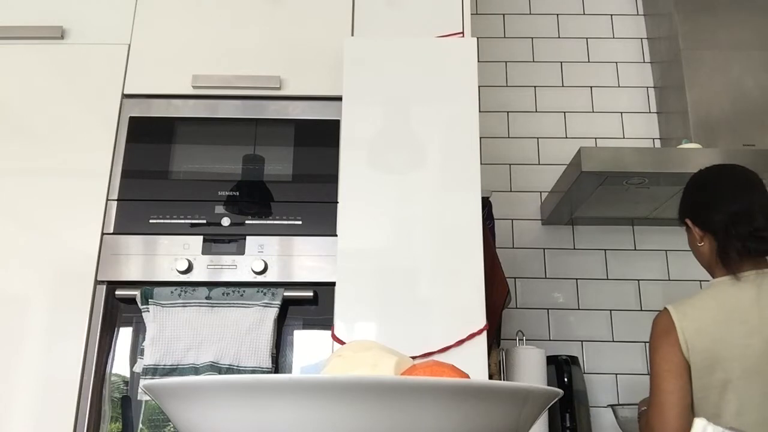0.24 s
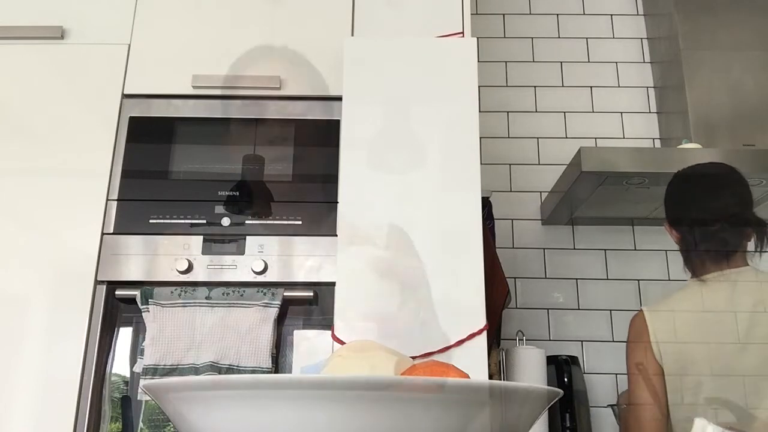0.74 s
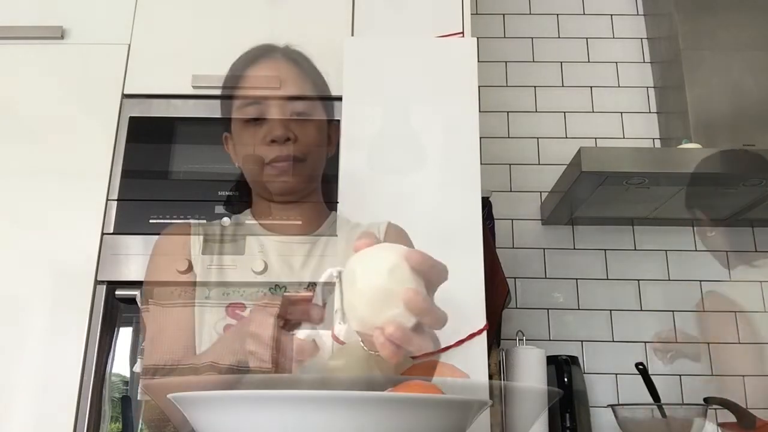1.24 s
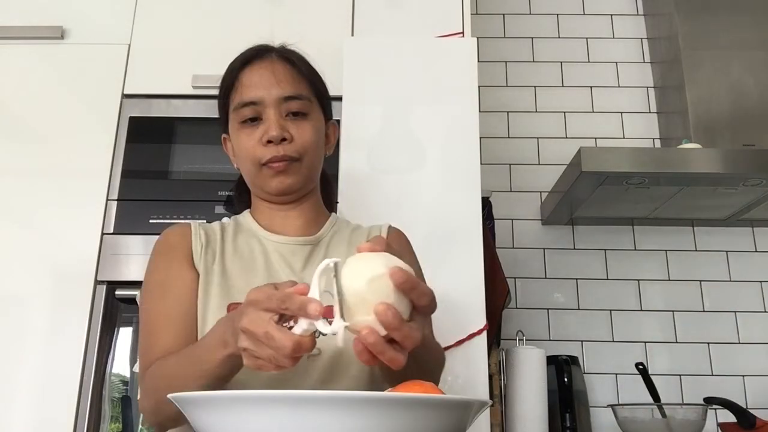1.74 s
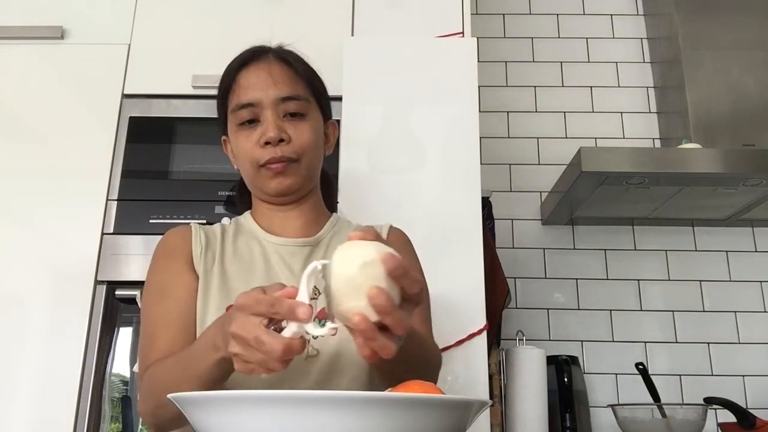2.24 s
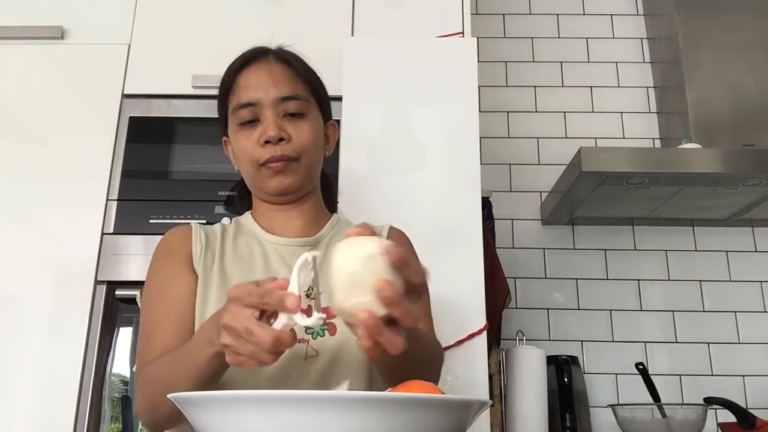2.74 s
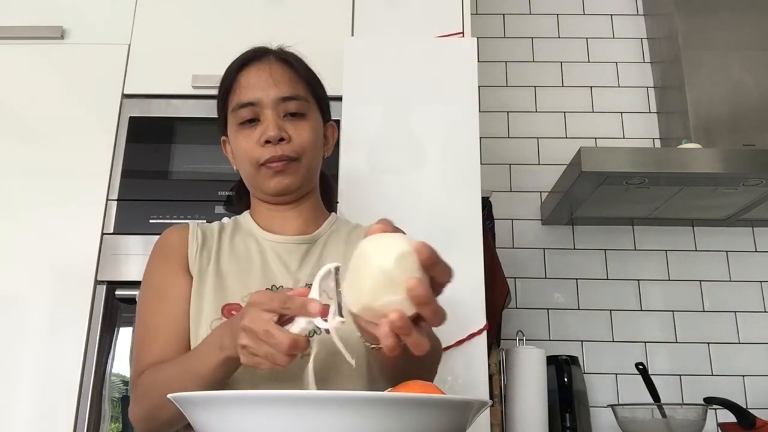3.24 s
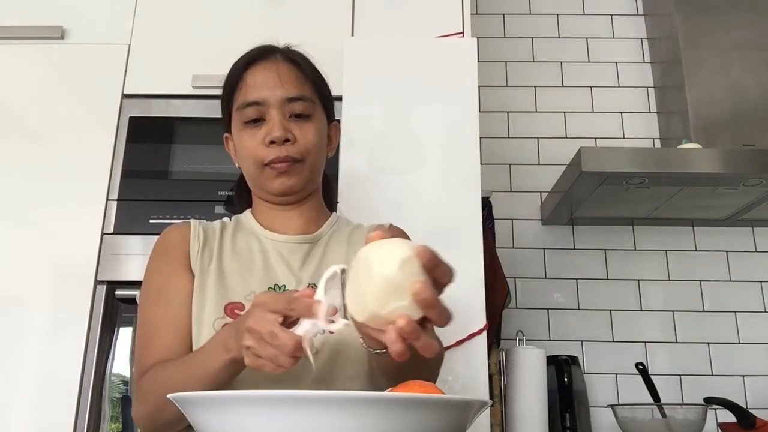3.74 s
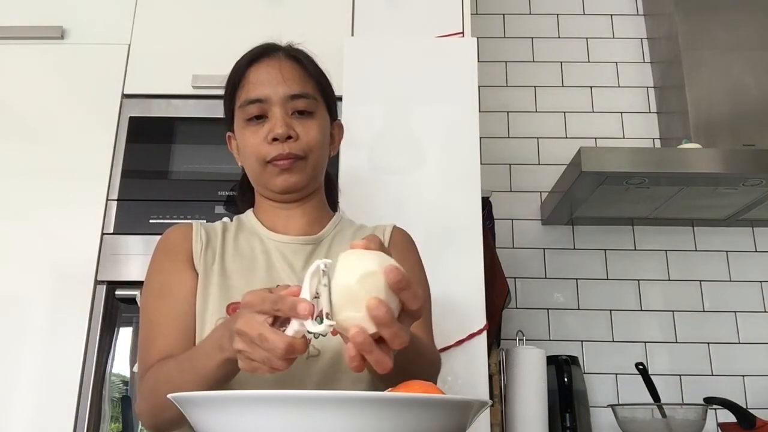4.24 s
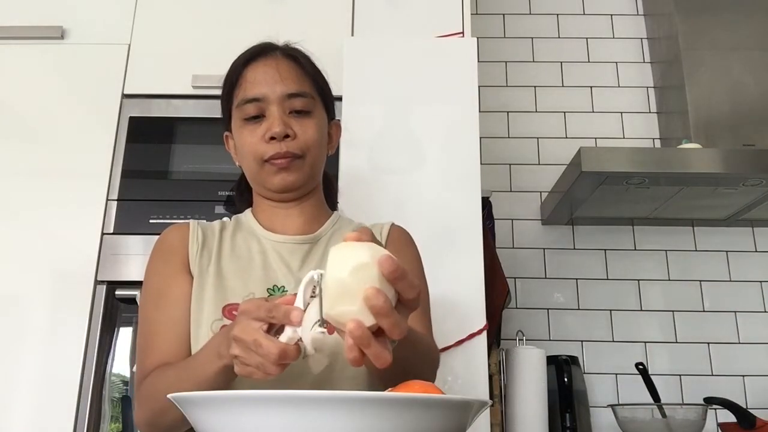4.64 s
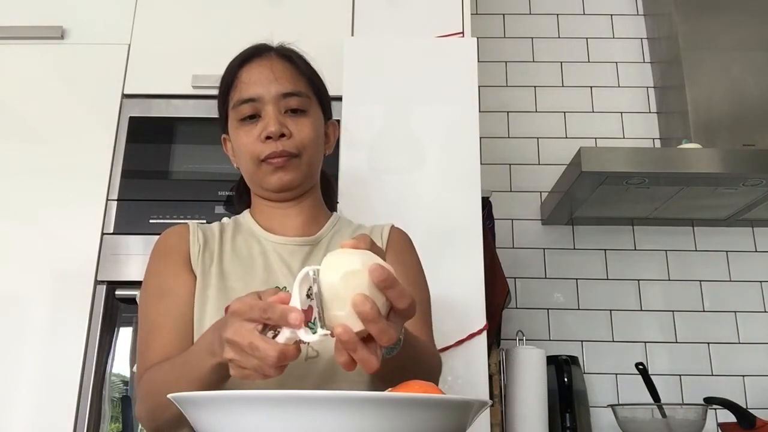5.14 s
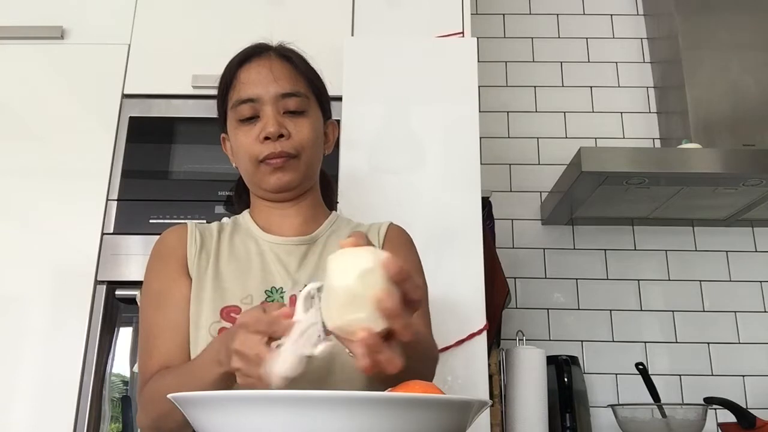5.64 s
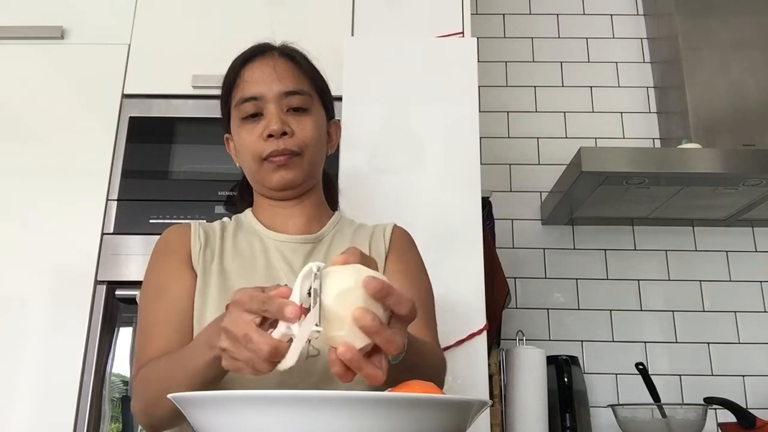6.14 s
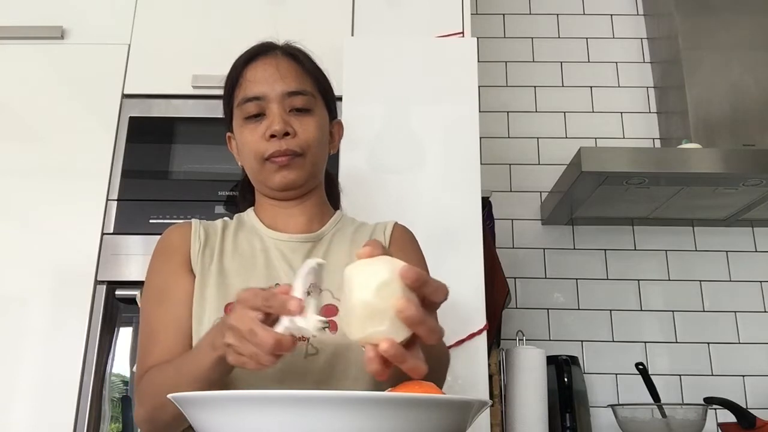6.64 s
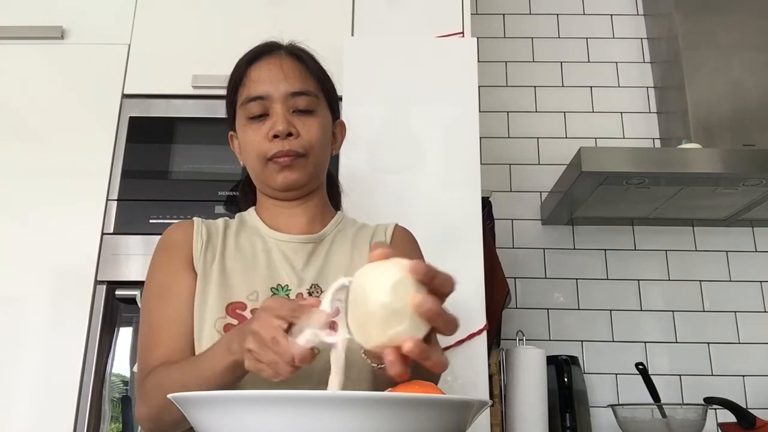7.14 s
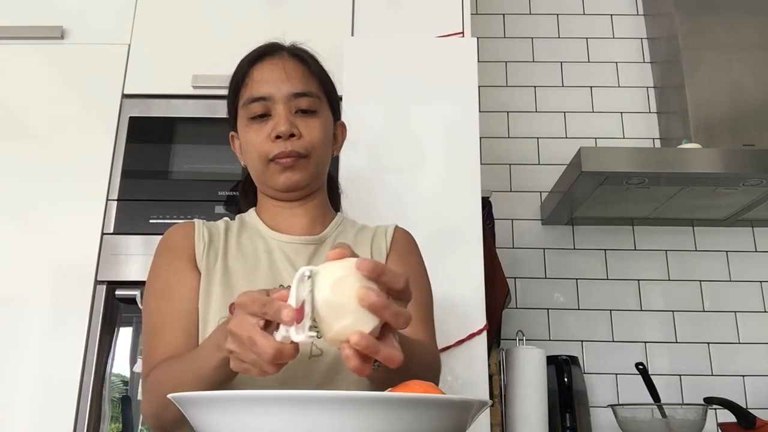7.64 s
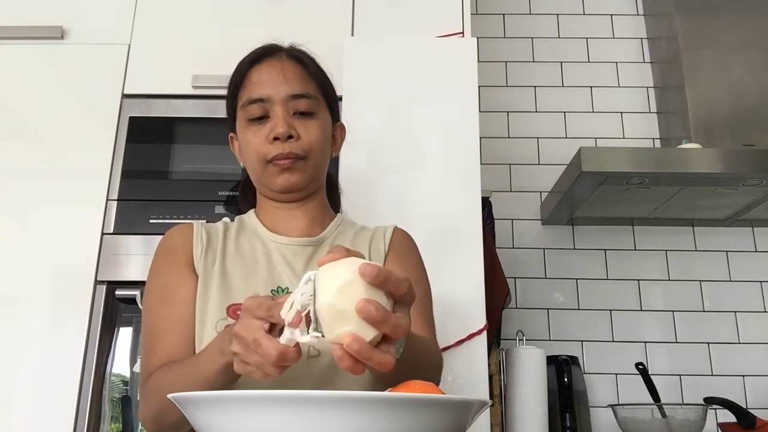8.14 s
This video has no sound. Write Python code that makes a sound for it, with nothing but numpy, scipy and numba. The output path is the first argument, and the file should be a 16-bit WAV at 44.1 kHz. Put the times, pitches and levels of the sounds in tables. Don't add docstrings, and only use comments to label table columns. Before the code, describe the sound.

Far-off cookware clanks twice, then close, crisp peeler strokes click and hiss unevenly through a firm wet vegetable over a low appliance hum.

```python
import sys
import numpy as np
from scipy import signal
from scipy.fft import rfft, irfft, next_fast_len
from scipy.io import wavfile
from numba import njit

SR = 44100
rng = np.random.default_rng(int(sys.argv[2]) if len(sys.argv) > 2 else 0)


def invert_db(x):
    u = np.asarray(x, float) / 20
    return 10 ** u


def wav_record(signal):
    frames = np.transpose(np.atleast_2d(signal))
    bounded = np.clip(frames, -1, 1)
    quanta = np.round(bounded * 32767).astype(np.int16)
    wavfile.write(sys.argv[1], SR, quanta)


N = 369999


def rms_one(x):
    return x / np.sqrt(np.mean(x ** 2) + 1e-20)


def in_time(rows):
    s, *columns = np.transpose(rows)
    return [np.interp(np.arange(N) / SR, s, column) for column in columns]


def coloured(x, spectrum):
    size = next_fast_len(len(x))
    hz, db = np.transpose(spectrum)
    log_bins = np.log(np.arange(size // 2 + 1) * SR / size + 1)
    gain = invert_db(np.interp(log_bins, np.log(hz), db, left=-90, right=-90))
    return rms_one(irfft(rfft(x, size) * gain, size)[:len(x)])


def drift(rate_hz):
    r = np.exp(-64 * np.pi * rate_hz / SR)
    slow = signal.lfilter([1], [1, -2 * r, r * r], rng.standard_normal(N // 32 + 1502))
    slow = slow[1500:]
    return np.interp(np.arange(N) / 32, np.arange(len(slow)), rms_one(slow))


def ring(x, hz, t60_s):
    r = invert_db(-60 / (t60_s * SR))
    w = 2 * np.pi * hz / SR
    return signal.lfilter([0, np.sin(w)], [1, -2 * r * np.cos(w), r * r], x + 1e-18)


@njit
def resonance(x, turn, r):
    y = np.zeros(len(x))
    for i in range(2, len(x)):
        y[i] = x[i] - x[i - 2] + 2 * r * np.cos(turn[i]) * y[i - 1] - r * r * y[i - 2]
    return y


def resonant(x, hz, width_hz):
    turn = 2 * np.pi * hz / SR * np.ones(N)
    return rms_one(resonance(x, turn, np.exp(-np.pi * width_hz / SR)))


# start in s, build-up in s, follow-through in s, peak in dB, hollow of the hand in Hz.
PULLS = [(1.075, 0.076, 0.07, -48, 1766), (1.8, 0.18, 0.07, -43, 1696), (2.335, 0.15, 0.095, -43.5, 1725),
         (2.955, 0.12, 0.16, -42, 1738), (3.53, 0.18, 0.11, -43, 1745), (4.243, 0.066, 0.029, -48.5, 1805),
         (4.49, .08, 0.021, -42, 1420), (5.225, .07, 0.028, -48, 1260), (5.555, 0.046, 0.098, -41, 1418),
         (6.378, 0.07, 0.11, -41, 1815), (6.945, 0.22, 0.047, -47, 1250),
         (7.815, 0.039, 0.059, -42.5, 1740), (8.275, 0.051, 0.033, -43.5, 1684)]
# start in s, build-up in s, peak in dB, hollow in Hz.
GRAZES = [(1.305, 0.021, -54.5, 1980), (1.792, 0.0084, -49.5, 1615), (2.3, 0.025, -64.5, 1870),
          (2.893, 0.0079, -65, 1720), (2.92, 0.051, -51, 1610), (3.5, 0.0048, -51, 1830),
          (4.147, .006, -76, 1610), (4.21, 0.034, -63, 1870), (4.763, 0.021, -48, 1853),
          (5.125, 0.016, -61.5, 1540), (5.19, 0.038, -58, 1500), (6.205, .008, -62, 1250),
          (6.236, 0.037, -51, 1720), (6.906, 0.0048, -67, 1350), (7.54, 0.014, -51.5, 1800),
          (7.57, 0.046, -57.5, 2060), (7.688, 0.014, -54.5, 2180), (8.2, .006, -72, 1780)]


def gestures():
    bite_max_s, bite_under_db, sag_db_per_s = 0.021, 6.5, 67.5
    hollow_open = 0.11
    t = np.arange(N) / SR
    pressure_db, progress, hollow_hz = np.full(N, -120.), np.zeros(N), np.full(N, 1700.)
    grazes = [(s, build_s, 0, db, hz) for s, build_s, db, hz in GRAZES]
    for s, build_s, through_s, db, hz in sorted([tuple(pull) for pull in PULLS] + grazes):
        bite_s = min(bite_max_s, build_s / 2)
        times_s = [0, bite_s, build_s, build_s + through_s + 1e-4]
        levels_db = [db - 23, db - bite_under_db, db, db - sag_db_per_s * through_s]
        shape_db = np.interp(t - s, times_s, levels_db, left=-120, right=-120)
        pressure_db = np.maximum(pressure_db, shape_db)
        on = t >= s
        progress[on] = np.clip((t[on] - s) / (build_s + through_s), 0, 1)
        hollow_hz[on] = hz * (1 + hollow_open * np.clip(1 - (t[on] - s) / build_s, 0, 1))
    return pressure_db, progress, hollow_hz


def lingering(db, fall_db_per_s, echo_db=0):
    t = np.arange(N) / SR

    def held(level_db, rate):
        return np.maximum.accumulate(level_db + rate * t) - rate * t

    return invert_db(np.maximum(held(db, 450), held(db + echo_db, fall_db_per_s)))


def tearing(per_s, spread_db):
    sizes = invert_db(spread_db * np.minimum(rng.exponential(1, N), 4)) * rng.choice([-1, 1], N)
    return sizes * (rng.random(N) < per_s / SR)


# frequency in Hz, density in dB per Hz.
FLESH = [(290, -32), (500, -52), (679, -16), (995, -8), (1880, -1.5), (2340, -8), (2860, -3), (3560, -10.5),
         (6390, -1), (10500, -22), (13600, -51), (22000, -120)]
# frequency in Hz, density in dB per Hz.
SPRAY = [(5590, -52), (9500, 3.5), (15100, 4), (16200, -37), (16300, -6.5), (16500, -60.5)]
# frequency in Hz, width in Hz, level in dB over the cut.
FRAME = [(2643, 310, -17.5), (3930, 250, -9.5), (6170, 1050, -15.5)]
# time in s, hollow in dB over the cut at the lift.
CUPPING = [(1.2, -2.5), (1.35, 0), (2, -3), (3, -3.5), (4.3, -3.5), (4.7, -13.5), (5.6, -8), (6.5, -9.5),
           (7.1, -26), (7.7, -14), (8.35, -7.5)]


def strokes():
    t = np.arange(N) / SR
    cut_db, progress, hollow_hz = gestures()
    bend = 0.15 * (progress - .5)
    ticks = tearing(per_s=9000, spread_db=3.5) * invert_db(.8 * drift(60))

    cut = invert_db(-3.0) * coloured(ticks, FLESH)
    for hz, width_hz, db in FRAME:
        cut = cut + invert_db(db + 0.56 * drift(7.2)) * resonant(ticks, hz * (1 + bend), width_hz)
    for hz in np.geomspace(2300, 15200, 14):
        peel_gain = invert_db(-14.5 + 4.15 * drift(6.4) - 2.6 * np.log2(hz / 4000))
        cut = cut + peel_gain * resonant(ticks, hz * (1 + 0.096 * drift(2.6)), 0.039 * hz)
    dull = signal.sosfiltfilt(signal.butter(2, 1400, "low", fs=SR, output="sos"), cut)
    patches = invert_db(-4 + 2.5 * drift(12))

    hollow = resonant(ticks, hollow_hz, width_hz=380)
    rings = sum(resonant(ticks, hollow_hz * (1 + offset), width_hz=16.3)
                for offset in (-.025, .025))
    root_hz = 1250 * (1 + .1 * drift(3) + bend)
    root_gain = invert_db(-14 + 0.67 * t + 2.8 * drift(6.5))
    root = root_gain * resonant(ticks, root_hz, width_hz=120)
    spray = invert_db(-4 + 2.6 * drift(23)) * coloured(tearing(per_s=10000, spread_db=-7.5), SPRAY)

    grows_db, snap_db = 6, 2.5
    hollow_db = cut_db + in_time(CUPPING)[0] + grows_db * (progress - 1) + snap_db * progress ** 8
    out = lingering(cut_db, 190, echo_db=-4.5) * (cut - dull)
    out += lingering(cut_db, 900, echo_db=-12) * (patches * dull + root)
    out += lingering(hollow_db, 218) * hollow
    out += lingering(hollow_db - 6.5, 159) * rings
    out += lingering(cut_db, 210, echo_db=-4.5) * spray
    return invert_db(-3.0) * out


def band(x, low_hz, high_hz):
    return signal.sosfilt(signal.butter(3, [low_hz, high_hz], "band", fs=SR, output="sos"), x)


# start in s, blade peak in dB, then handle, vegetable and edge
# in dB over the blade.
CLICKS = [(1.626, -45.5, -31, -32, -31), (1.8085, -20.5, -8, -34, -9), (1.821, -36, -19, -32, -16),
          (1.8252, -51, -17, -23, -16), (2.338, -30.5, -2, -40, -12), (2.8893, -35, -1.5, -20, 0),
          (2.904, -44, -7, -21, 6), (3.4992, -42.5, 5.5, -8.5, -5), (3.5094, -35, -1.5, -25, -8),
          (4.149, -63, 7, -4, -16), (4.185, -67, 11, 2, -6), (5.1334, -49.5, 1, -12, -20),
          (5.1463, -54, 8.5, -2, -20), (5.185, -58, 0, -9, -7), (5.477, -54, -12, -14, -8),
          (6.1804, -46, 4.5, -13, -20), (6.2038, -31, -7.5, -11.5, -4), (6.9053, -42, 0.5, -11, -20),
          (7.5201, -35, -2.5, -14.5, -20), (7.535, -31.5, -3.5, -17, -3), (7.7122, -50, -9, -23, -20),
          (8.1999, -52, 12, -11, -22)]
BLADE_HZ = [4480, 5600, 6340, 7030, 7870]
BLADE_DB = [-5, 1.5, 1, -6, -20]


def clicks():
    out, t = np.zeros(N), np.arange(SR // 20) / SR
    for s, db, handle_db, body_db, edge_db in CLICKS:
        chatter = rng.standard_normal(len(t)) * np.exp(-(t / 0.0023) ** 4)
        strengths = invert_db(2 * rng.standard_normal(len(BLADE_HZ)) + BLADE_DB)
        handle_hz = 3480 - 60 * s
        steel = sum(g * ring(chatter, hz, .007) for g, hz in zip(strengths, BLADE_HZ))
        parts = [(band(steel, 4000, 11000), 0),
                 (band(ring(chatter, handle_hz, .008), 1800, 4400), handle_db),
                 (band(ring(chatter, 1150, .012), 800, 1700), body_db),
                 (band(chatter, 10500, 16800), edge_db)]
        at = round(s * SR)
        for part, part_db in parts:
            out[at:at + len(t)] += invert_db(db + part_db) * part / np.abs(part).max()
    return out


def kitchen(x, wet_db):
    t60_s = 0.19
    t = np.arange(SR // 2) / SR
    tail = rng.standard_normal(len(t)) * invert_db(-60 * t / t60_s) * (t > .004)
    tail = signal.lfilter([1], [1, -.4], tail)
    return invert_db(wet_db) * signal.fftconvolve(x, tail / np.sqrt(np.sum(tail ** 2)))[:N]


def cookware(knocks, modes, rough, width_hz):
    blows = np.zeros(N)
    for s, db in knocks:
        blows[round(s * SR)] = invert_db(db)
    span = slice(0, SR * 3 // 2)
    out = np.zeros(N)
    for hz, db, t60_s in modes:
        decay = invert_db(-60 / (min(t60_s, .46) * SR))
        dying = signal.lfilter([1], [1, -decay], blows[span] + 1e-18)
        noise = ring(rng.standard_normal(len(dying)), hz, 2.2 / width_hz)
        clean = np.sin(2 * np.pi * (hz * np.arange(len(dying)) / SR + rng.random()))
        out[span] += invert_db(db - 3) * dying * ((1 - rough) * clean + rough * rms_one(noise))
    return out


def wash(start_s, body, db, rise_s, tail_s):
    t = np.maximum(np.arange(N) / SR - start_s, 0)
    shape = (1 - np.exp(-t / rise_s)) * np.exp(-t / tail_s)
    return invert_db(db) * shape * coloured(rng.standard_normal(N), body)


# start in s, level in dB.
BOWL_KNOCKS = [
    (.256, -37),
    (.263, -44.5),
]
# frequency in Hz, level in dB, t60 in s.
BOWL = [(302, -11.5, 0.52), (442, -12, 0.43), (724, -3, 0.37), (832, -11, 0.48), (1417, -11, 0.46),
        (1806, -18, 0.27), (2430, -9, 0.11), (2500, -12, .45), (3020, -16, 0.3), (3450, -18, 0.18),
        (3820, -12, 0.15), (3930, -19, 0.27), (4530, -25, .18)]
# frequency in Hz, density in dB per Hz.
BOWL_BODY = [(88, -47), (150, -29), (448, -7), (534, -22), (714, -10), (2060, -25), (2380, 3), (7000, -36),
             (9100, -65), (15400, -120)]


def bowl():
    rings = cookware(BOWL_KNOCKS, BOWL, rough=.65, width_hz=45)
    return rings + wash(.256, BOWL_BODY, db=-47, rise_s=.004, tail_s=.065)


# start in s, level in dB.
POT_KNOCKS = [
    (.766, -36.5),
    (.778, -39.5),
    (.79, -40),
    (.843, -57),
    (.89, -54),
]
# frequency in Hz, level in dB, t60 in s.
POT = [(379, -14, 0.51), (712, -13.5, 0.37), (867, -12, 0.33), (1433, -7.5, 0.42), (2020, -15, 0.26),
       (2610, -19, 0.65), (3250, -22.5, 0.61), (4020, -15.5, 0.4), (1560, -11.5, 0.4), (4480, -8, 0.09),
       (1250, -14.5, 0.4), (4960, -17, 0.34), (5140, -15, 0.11), (5780, -17, 0.68), (7600, -27, 0.3),
       (8900, -15, 0.25), (9680, -11, 0.14), (10700, -21, 0.19), (11100, -33, 0.22), (11600, -17, 0.14),
       (13800, -27, 0.17)]
# frequency in Hz, density in dB per Hz.
POT_BODY = [(88, -18), (150, -28), (720, -24), (1050, -28), (1440, -3.5), (2380, -27), (2560, -11),
            (4090, -22.5), (13000, -24)]
# start in s, level in dB.
POT_ROCKS = [
    (.925, -44.5),
    (.945, -46.5),
]
# frequency in Hz, level in dB, t60 in s.
POT_BASE = [(356, -0.5, 0.2), (698, -4.5, 0.099), (124, -11, 0.14)]


def pot():
    rings = cookware(POT_KNOCKS, POT, rough=.6, width_hz=40)
    rocks = cookware(POT_ROCKS, POT_BASE, rough=0.22, width_hz=42)
    return rings + wash(.766, POT_BODY, db=-48, rise_s=.008, tail_s=.065) + rocks


# frequency in Hz, level in dB, t60 in s.
CLINK = [(2065, -7, 0.99), (2870, -5.5, 0.53), (8000, -3, .06), (8850, 7, 0.055), (9550, 4, .07),
         (13800, -7, 0.09)]


def clink():
    touch = np.zeros(N)
    touch[round(3.41 * SR)] = invert_db(-61)
    return sum(invert_db(db) * ring(touch, hz, t60_s) for hz, db, t60_s in CLINK)


# time in s, hum in dB.
HUM = [(0.0, -78), (0.04, -75), (0.88, -85), (1.25, -67.5), (2.08, -58), (2.75, -68), (3.7, -59.5),
       (4.39, -67), (5.2, -59.5), (8.3, -58.5)]
# frequency in Hz, width in Hz, level in dB.
DRONES = [(73.2, 27, -5.5), (134.6, 15.8, 0), (166.9, 10.3, -1), (192.3, 16.4, -8), (348.5, 90, -9.5)]
# frequency in Hz, density in dB per Hz.
NEAR_AIR = [(18, -38), (30, -4.5), (54, 0.5), (112, -5), (171, -8.5), (255, -19), (340, -20), (409, -34),
            (443, -27), (547, -30.5), (928, -42), (1270, -42.5), (9230, -47.5), (14800, -54), (16500, -77)]
# frequency in Hz, density in dB per Hz.
FAR_AIR = [(18, -41), (30, 10), (70, -26), (80, -17), (101, 7.5), (118, -20), (248, -12.5), (340, -9.5),
           (608, -18), (928, -20.5), (2670, -27.5), (12300, -32), (16500, -43)]


def background():
    t = np.arange(N) / SR
    turn = 2 * np.pi * 48.3 * t
    hum = np.sqrt(2) * invert_db(in_time(HUM)[0]) * np.sin(turn)
    octave_db = -70.5 + 0.59 * t + 1.9 * drift(4.6)
    octave = np.sqrt(2) * invert_db(octave_db) * np.sin(2 * turn + 1.05 * drift(3.1))

    rumble_db = -67.5 + 9.5 * np.tanh(t / 1.35 / 2)
    drones = np.zeros(N)
    for hz, width_hz, db in DRONES:
        narrow = resonant(resonant(rng.standard_normal(N), hz, width_hz), hz, width_hz)
        drones += invert_db(db + 2.9 * drift(6.1) + 1.27 * drift(8.2)) * narrow

    air = coloured(rng.standard_normal(N), NEAR_AIR)
    low = signal.sosfilt(signal.butter(2, 900, "low", fs=SR, output="sos"), air)
    hiss_db = -65.5
    near = invert_db(rumble_db - 19.0) * low + invert_db(hiss_db + 17) * (air - low)
    far = invert_db(-60.5 - 3.0) * coloured(rng.standard_normal(N), FAR_AIR)
    fade_start_s, fade_end_s = 0.31, 3.5
    share = np.clip((t - fade_start_s) / (fade_end_s - fade_start_s), 0, .97)
    return hum + octave + invert_db(rumble_db - 6) * drones + share * near + np.sqrt(1 - share ** 2) * far


def scene():
    close = clicks()
    peeling = strokes() + close + kitchen(close, wet_db=-9.5)
    mono = peeling + bowl() + pot() + clink() + background()
    return np.array([mono, mono])


def band_limit(x):
    return signal.sosfilt(signal.butter(12, 16980, fs=SR, output="sos"), x)


# frequency in Hz, width in Hz, level in dB.
PORT_DIPS = [(4890, 490, -1.5), (10140, 1780, -6.5), (2257, 52, -6)]


def record(dry):
    low_hz, top_hz = 40, 15850
    hz = np.arange(N // 2 + 1) * SR / N
    dips_db = sum(db * np.exp(-((hz - at_hz) / width_hz) ** 2) for at_hz, width_hz, db in PORT_DIPS)
    ends_db = -30 * np.clip((low_hz - hz) / 12, 0, 1) - 26 * np.clip((hz - top_hz) / 150, 0, 1)
    mix = irfft(rfft(dry) * invert_db(dips_db + ends_db), N)
    return band_limit(mix)


dry = scene()
out = record(dry)
wav_record(out)
```